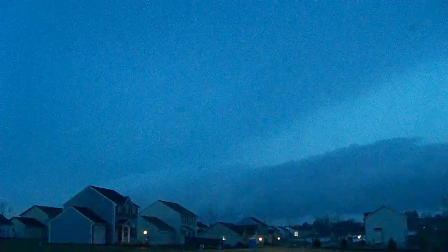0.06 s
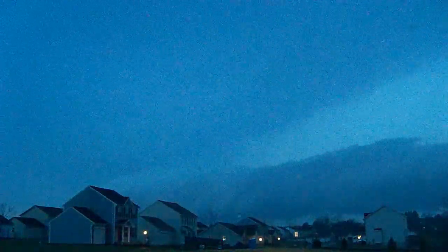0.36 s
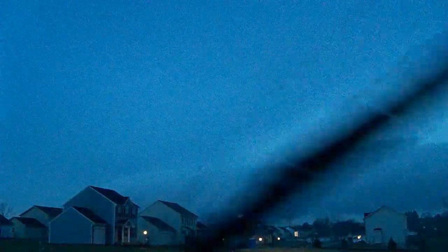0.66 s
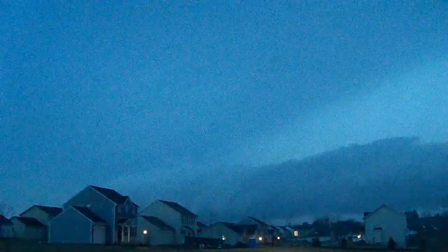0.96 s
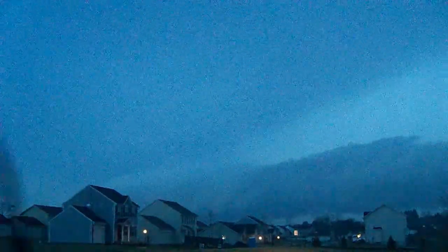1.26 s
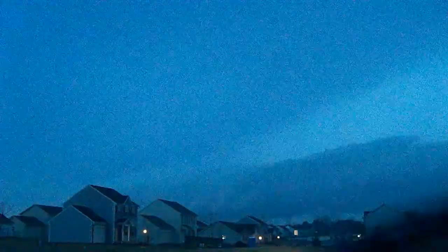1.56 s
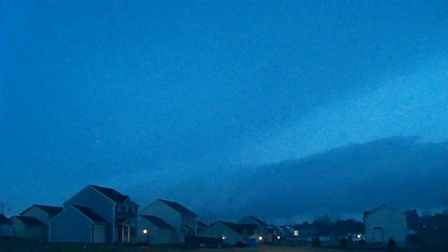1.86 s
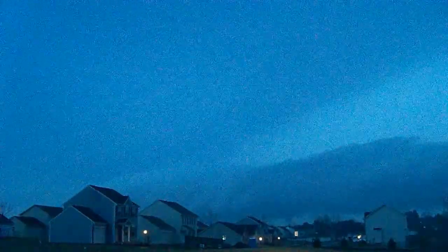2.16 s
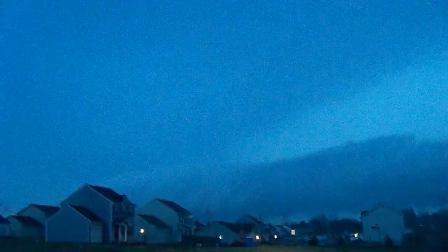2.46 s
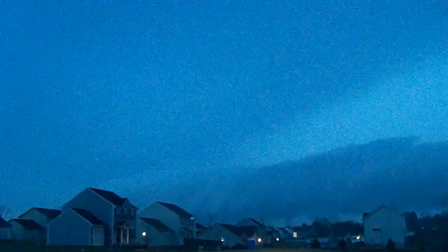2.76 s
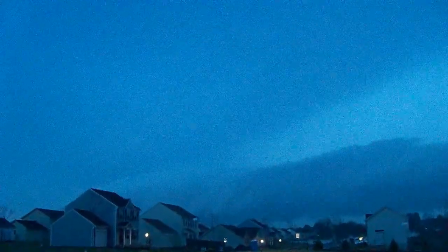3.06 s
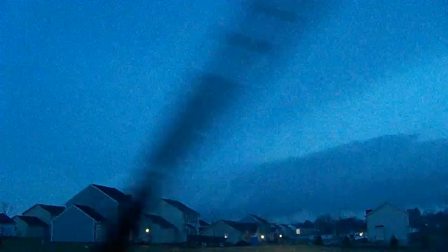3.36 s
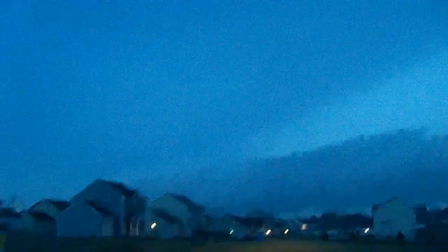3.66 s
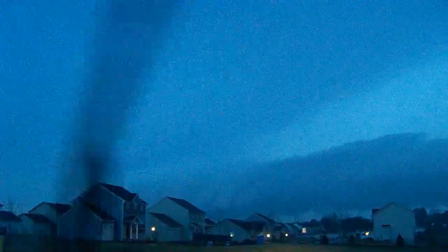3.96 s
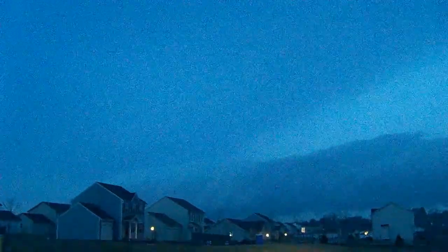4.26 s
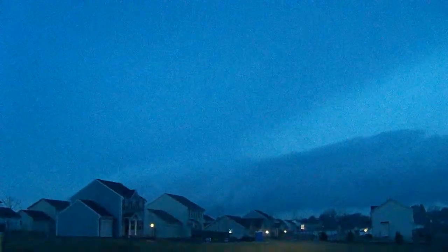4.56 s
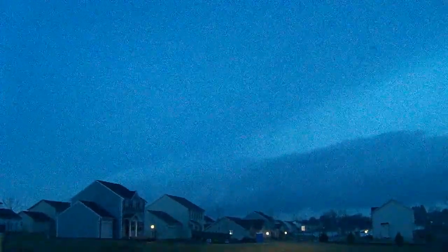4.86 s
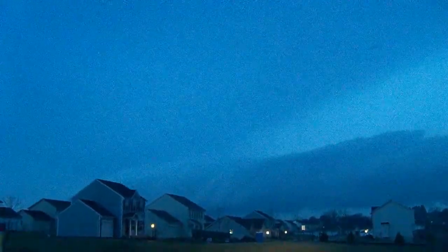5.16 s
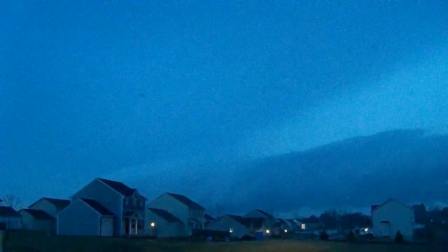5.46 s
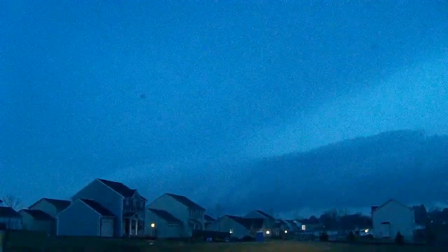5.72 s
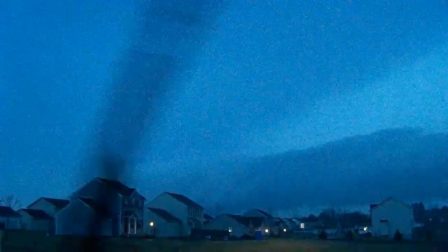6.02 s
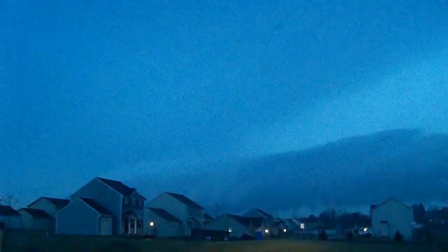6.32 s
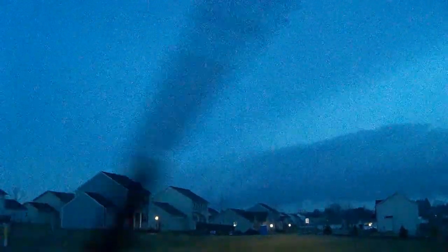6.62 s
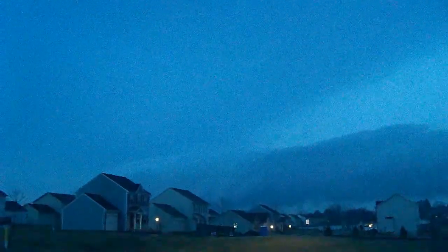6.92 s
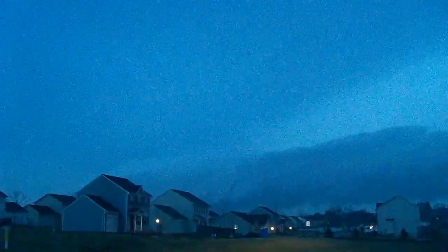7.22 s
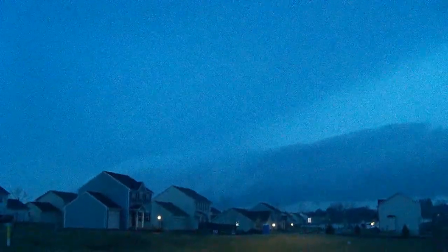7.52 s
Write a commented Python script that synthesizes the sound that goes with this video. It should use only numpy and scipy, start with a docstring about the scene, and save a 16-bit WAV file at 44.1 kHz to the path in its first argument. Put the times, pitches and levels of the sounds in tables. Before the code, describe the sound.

Inside a parked car, raindrops tick and wipers sweep while a low storm rumble swells and something clatters close by.

```python
"""Inside a parked car under a storm front. From the start raindrops strike glass and roof, and the wipers
begin the first of three sweeps: the motor whines, the linkage thumps, the rubber squeaks by stick-slip.
Halfway through, a low storm rumble swells and holds, exciting cabin resonances, and gusts bring washes
of rain. After five seconds something knocks about close by, ringing the trim; a short hiss follows,
and the last sweep runs under the rumble."""
import sys
import numpy as np
from scipy import signal
from scipy.fft import rfft, irfft
from scipy.io import wavfile
from scipy.ndimage import uniform_filter1d

SR = 44100
rng = np.random.default_rng(int(sys.argv[2]) if len(sys.argv) > 2 else 0)


def log_audio(samples):
    """Write samples as a 16-bit WAV file to the path given in sys.argv[1]."""
    # one column per channel
    frames = np.atleast_2d(samples).T
    # limit to full scale, then quantise
    limited = np.clip(frames, -1, 1)
    pcm = np.round(limited * 32767).astype(np.int16)
    wavfile.write(sys.argv[1], SR, pcm)


N = 338952
TIME = np.arange(N) / SR


# starts of the wiper sweeps, each out and back: t/s
SWEEP_STARTS = [.272, 2.890, 5.512]
def each_sweep(rows):
    """Periodic motion: the same events recur in every sweep."""
    return [(start + s, *rest) for start in SWEEP_STARTS for s, *rest in rows]


# shudders as the arms start, turn and park: t/s into the sweep, level/dB, rise/s, fall/s
SHUDDERS = [(.025, -32, .012, .03), (.165, -27, 0.05, 0.09), (.38, -30.5, 0.041, 0.055),
            (.855, -28, .015, .015), (.97, -26, 0.064, 0.035), (1.655, -23, 0.019, 0.042)]
# spectrum of the shaking: f/Hz, level/dB
SHAKE_SPECTRUM = [(30, -19.5), (70, -14), (105, 2), (150, 1.5), (200, -7.5), (300, -19.5), (420, -25.5),
                  (900, -45.5), (2000, -58.5)]
# the linkage taking up its play: t/s into the sweep, level/dB
THUMPS = [(.368, -30.5), (.843, -24.5), (.9, -29), (1.642, -23)]
# modes of cowl and cabin: f/Hz, level/dB, T60/s
COWL_MODES = [(45.4, -15.5, 0.4), (110.1, -5, 0.31), (120.66, -3, 0.48), (139.4, -5, 0.095),
              (161, -17, 0.057), (220, -17, 0.14), (311.2, -15.5, 0.19)]
def wiper_drive(run_s=1.68, shake_db=-4, thump_db=-1):
    """Forced vibration and backlash: the running linkage shakes the cowl and thumps at the turns."""
    running = [swell(s, run_s, db=-40.5, rise_s=.012, fall_s=.06) for s in SWEEP_STARTS]
    shudders = [swell(s, 0, db, rise_s, fall_s) for s, db, rise_s, fall_s in each_sweep(SHUDDERS)]
    out = undb(shake_db) * power_sum(running + shudders) * steady(noise(SHAKE_SPECTRUM), .05)
    for s, db in each_sweep(THUMPS):
        add(out, s, undb(db + thump_db) * ring(COWL_MODES, TIME[:SR // 2], push_s=.0042))
    return out


# bounces as the blades flip over: t/s, duration/s, gap between blows/s, level/dB
BOUNCES = [(.35, .09, .0257, -20.5), (1.216, .05, .032, -20), (2.97, .09, .0257, -20.5),
           (3.836, .05, .032, -23), (5.605, .09, .0257, -29), (6.456, .05, .032, -23)]
# modes of an arm on the glass: f/Hz, level/dB, T60/s
ARM_MODES = [(133, 0, .11), (195, -8.5, .07), (290, -16, .05)]
def wiper_bounces():
    """Repeated impact: evenly spaced soft blows on the glass excite the modes of the arms."""
    out = np.zeros(N)
    for s, length, gap_s, db in BOUNCES:
        blow = ring(ARM_MODES, TIME[:SR // 5], push_s=.003)
        for delay in np.arange(0, length, gap_s):
            add(out, s + delay, undb(db) * blow)
    return out


# rubber squeaks: t/s, duration/s, level/dB, first f/Hz, last f/Hz, roughness (0-1), relative octave/dB
SQUEAKS = [(.350, 0.015, -40.5, 1480, 1780, .5, -26), (0.364, 0.0087, -32.5, 1610, 1380, 0.53, -31),
           (0.37, 0.0095, -36.5, 1300, 1330, 0.76, -28), (0.381, 0.011, -36.5, 1395, 1290, 0.3, -28),
           (1.2417, .012, -33.5, 1830, 1716, 0.2, -13), (1.249, 0.01, -40, 1715, 1800, 0.45, -6),
           (1.253, .008, -41, 2330, 2450, .3, -25), (2.973, 0.013, -41.5, 1510, 1620, 0.47, -26),
           (2.985, .012, -34.5, 1436, 1815, .7, -26), (3.001, 0.015, -33.5, 1220, 1366, 0.42, -28),
           (3.846, 0.013, -44.5, 2100, 1880, 0.77, -13), (3.858, .015, -34.5, 1756, 1860, 0.3, -14),
           (5.6, 0.008, -37, 1672, 1670, .5, -18), (5.608, 0.0096, -32.5, 1410, 1630, 0.68, -24),
           (5.622, 0.011, -36.5, 1290, 1390, 0.35, -26)]
# resonances of blade and glass: f/Hz, level/dB
RASP_SPECTRUM = [(300, -22), (900, 0), (1300, -1), (1900, 0), (2400, 5), (2800, -17), (3200, -9),
                 (3550, -15), (4000, 0), (4500, -18.5), (5600, -15.5), (7000, -29)]
def wiper_squeaks(squeak_db=-.5, third_db=-14, rasp_db=-3.5):
    """Stick-slip oscillation: the rubber chirps as it flips; uneven slips excite blade and glass."""
    out = np.zeros(N)
    for s, length, db, first_hz, last_hz, rough, octave_db in SQUEAKS:
        n = int(length * SR)
        hz = np.linspace(first_hz, last_hz, n) * (1 + .12 * rough * walk(1100, n))
        grip = undb(5 * rough * walk(800, n))
        phase = 2 * np.pi * np.cumsum(hz) / SR
        slip = np.sin(phase) + undb(octave_db) * (np.sin(2 * phase) + undb(third_db) * np.sin(3 * phase))
        rasp = undb(rasp_db) * rough * unit(colour(rng.standard_normal(n), RASP_SPECTRUM))
        chirp = (unit(slip * grip) + rasp) * signal.windows.tukey(n, .5)
        add(out, s, undb(db + squeak_db) * unit(chirp))
    return cabin_echoes(out)


# rubber scraping wet glass: t/s into the sweep, duration/s, level/dB, cutoff f/Hz
SCRAPES = [(.058, .11, -45.5, 4400), (.72, 0.15, -52.5, 4000), (.875, .09, -49.5, 2000),
           (.925, .095, -51, 6000), (1.592, .065, -46, 3300), (1.645, .035, -53.5, 5000)]
def wiper_scrapes():
    """Sliding friction: the blades rub over the glass at the same points of each sweep."""
    return friction(each_sweep(SCRAPES))


# the two strokes, the whine rising along each: t/s into the sweep, duration/s, first f/Hz, last f/Hz
STROKES = [(.13, .84, 701, 826.5), (.97, .68, 721.4, 838.5)]
def wiper_motor(whine_db=-56.5, hum_db=-55, whine_at=.3, hum_at=.8, spread=.26):
    """Rotational tones: the motor whines early in a stroke and hums an octave lower as the load eases."""
    out = np.zeros(N)
    for s, length, first_hz, last_hz in each_sweep(STROKES):
        n = int(length * SR)
        along = np.linspace(0, 1, n)
        hz = np.linspace(first_hz, last_hz, n) * (1 + .024 * walk(110, n))  # the blades drag unevenly
        phase = 2 * np.pi * np.cumsum(hz) / SR
        whine = undb(whine_db + 2 * walk(27, n)) * np.exp(-((along - whine_at) / spread) ** 2)
        hum = undb(hum_db + 2 * walk(25, n)) * np.exp(-((along - hum_at) / spread) ** 2)
        add(out, s, (whine * np.sin(phase) + hum * np.sin(phase / 2)) * signal.windows.tukey(n, .1))
    return out


# the biggest drops on the glass, and one high tick with the knock at 2.36 s: t/s, level/dB, ring f/Hz
DROPS = [(0.0645, -43, 2070), (.077, -41, 2300), (.1072, -44, 3300), (0.161, -46, 2260),
         (0.1934, -37.5, 2500), (.2094, -44, 1210), (0.2213, -42, 1800), (.245, -44, 3600),
         (.4409, -43, 1210), (0.539, -41, 1990), (0.7604, -43, 2410), (0.7993, -41.5, 1590),
         (0.8589, -44.5, 2430), (1.147, -43, 1850), (1.4022, -50, 1790), (1.6448, -45.5, 2020),
         (1.6898, -43, 1550), (1.761, -33, 2500), (1.8204, -41.5, 2790), (1.835, -42, 2400),
         (1.933, -39, 1900), (1.962, -43.5, 1860), (2.015, -41.5, 1910), (2.0215, -43, 2400),
         (2.0464, -51, 2630), (2.1357, -39, 1500), (2.2394, -45.5, 1360), (2.348, -41, 3900),
         (2.3585, -44, 5600), (2.4433, -49, 2540), (2.46, -44.5, 2600), (2.4834, -41, 2260),
         (2.5415, -43.5, 1640), (2.6236, -41, 1770), (2.743, -40.5, 2350), (2.8825, -40.5, 2540),
         (3.5455, -43, 1400), (3.5567, -40, 2900), (3.6575, -41, 3200), (3.6763, -37.5, 2170),
         (3.71, -42, 2200), (4.4922, -41, 4200), (4.554, -40, 3050), (4.6872, -40.5, 2600),
         (5.0621, -38, 1825), (5.7646, -37, 2400), (5.7745, -36, 2000), (5.789, -39, 3600),
         (5.9264, -37, 2430), (6.1321, -39, 1540), (7.0227, -39.5, 2270)]
# spectrum of a drop's impact: f/Hz, level/dB
DROP_SPECTRUM = [(30, -40.5), (150, 0), (400, 0), (680, 8), (1000, 4), (1700, 1), (2400, 3.5), (3500, -4.5),
                 (5200, -10), (7000, -21), (9000, -46.5)]
def raindrops(drop_db=1.2, ring_db=-9, ring_t60=.024, spot_db=3):
    """Impact excitation: each big drop cracks on the glass, and the struck spot rings at its own pitch."""
    out, t = np.zeros(N), TIME[:SR // 8]
    for s, db, hz in DROPS:
        spot = [(f, level + spot_db * np.exp(-(2 * np.log2(f / hz)) ** 2)) for f, level in DROP_SPECTRUM]
        contact = impact(t, hit_t60=.022, tail_t60=.09, tail_db=-7) * (1 - np.exp(-t / .0005))
        crack = peak(colour(contact, spot))
        tone = undb(ring_db) * fade(t, ring_t60) * np.sin(2 * np.pi * hz * t)
        add(out, s, undb(db + drop_db) * (crack + tone))
    return out


# rolls swelling out of the storm: t/s, rumble level/dB, roar level/dB, rise/s, fall/s
ROLLS = [(3.6, -30.5, -38.5, 0.034, 0.35), (3.8, -32.5, -40.5, 0.062, 0.16),
         (3.989, -19.5, -34.5, 0.046, 0.2), (4.15, -23, -36.5, 0.085, .1),
         (4.55, -26.5, -37.5, 0.035, 0.046), (4.69, -28, -49, .012, 0.021), (4.805, -27, -51, 0.017, 0.02),
         (5.0, -30.5, -43, .04, 0.047), (5.75, -35, -39, 0.32, 0.3), (6.49, -33.5, -38, 0.084, .16),
         (7.22, -34, -43.5, 0.022, .03), (7.48, -38, -47, 0.035, 0.033)]
# spectra of the low rumble and the roar above it: f/Hz, level/dB
RUMBLE_SPECTRUM = [(20, -42.5), (48, -10), (72, -18), (100, -5.5), (145, 3.5), (185, -3), (225, -6),
                   (270, -12), (330, -22.5), (600, -65)]
ROAR_SPECTRUM = [(130, -24), (260, -3), (360, 6.5), (440, -0.5), (540, -6), (700, -7), (900, -12),
                 (1300, -17), (1900, -35.5), (3500, -51.5), (6500, -43), (8000, -62.5)]
def storm(storm_db=-1, grain_db=1.67, cabin_hz=530, cabin_q=30, drone_db=-20):
    """Broadband excitation: a rolling rumble and a grainy roar, which drives a narrow cabin resonance."""
    bed = swell(3.585, hold_s=3.16, db=0, rise_s=.028, fall_s=1.7)
    rolls = [(swell(s, 0, 0, rise, fall), low_db, high_db) for s, low_db, high_db, rise, fall in ROLLS]
    low_gain = power_sum([undb(-35.5) * bed] + [undb(db) * roll for roll, db, _ in rolls])
    high_gain = power_sum([undb(-41.5) * bed] + [undb(db) * roll for roll, _, db in rolls])
    rumble = low_gain * steady(noise(RUMBLE_SPECTRUM), .065)
    grains = rng.standard_normal(N) * undb(grain_db * walk(90))
    roar = high_gain * steady(unit(colour(grains, ROAR_SPECTRUM)), .22)
    resonance = signal.lfilter(*signal.iirpeak(cabin_hz, cabin_q, fs=SR), grains)
    drone = low_gain * steady(unit(resonance), .22)
    return undb(storm_db) * (rumble + roar) + undb(drone_db) * drone


# cabin resonances stirred by the storm's rolls: t/s, duration/s, level/dB, f/Hz
DRONES = [(3.72, 0.15, -41.5, 380), (3.95, 0.33, -42, 528), (4.53, .1, -40, 365.5),
          (6.94, .13, -42.5, 362.7), (6.99, .11, -37, 165.4), (7.41, .15, -36.5, 175.2)]
def cabin_drones(waver_db=2):
    """Cavity resonance: single modes of the cabin hum briefly, wavering in pitch and level."""
    out = np.zeros(N)
    for s, length, db, hz in DRONES:
        n = int(length * SR)
        phase = 2 * np.pi * np.cumsum(hz * (1 + .015 * walk(40, n))) / SR
        envelope = undb(waver_db * walk(45, n)) * signal.windows.tukey(n, .7)
        add(out, s, undb(db) * unit(np.sin(phase) * envelope))
    return out


# knocks on the trim, among them the wiper motor starting and parking each sweep: t/s, level/dB, relative
# clack/dB, cutoff f/Hz
KNOCKS = [(0.275, -32.5, -27, 6000), (1.174, -29, -16, 2000), (1.893, -33, 1.5, 2400),
          (2.357, -39, 3, 6500), (2.3845, -35, -3, 2400), (2.898, -28, -29, 6000), (2.914, -31, -12, 2500),
          (3.66, -29, -5, 1100), (4.511, -25, 2, 1800), (5.1445, -17, -13, 6500), (5.154, -23.5, 3.5, 6500),
          (5.1571, -15, -9, 6000), (5.171, -23.5, -4, 5000), (5.1847, -14, -19, 2500),
          (5.2104, -19, -15, 2200), (5.237, -24, -8, 3000), (5.243, -23.5, -8, 4000),
          (5.251, -24, -8, 3000), (5.264, -27, -12, 2500), (6.484, -35, 9, 1400), (6.5, -26.5, -2, 1300),
          (7.133, -41, -1, 6000)]
# modes of the trim: f/Hz, level/dB, T60/s
TRIM_MODES = [(205, -6.5, 0.056), (262.7, -1.5, 0.18), (320, 4, 0.066), (710, -6, 0.012)]
# spectrum of contact noise: f/Hz, level/dB
CLACK_SPECTRUM = [(250, 1), (700, 6), (1000, 0), (1400, 1), (2300, -5.5), (4000, -10), (7000, -19),
                  (9000, -60.5)]
def knocks(thud_db=-11):
    """Free vibration: struck plastic trim rings hollow, with a dry clack and a thud through the cabin."""
    out, t = np.zeros(N), TIME[:SR // 5]
    for s, db, clack_db, cutoff_hz in KNOCKS:
        contact = lowpass(impact(t, hit_t60=.016, tail_t60=.096, tail_db=-5), cutoff_hz)
        clack = peak(colour(contact, CLACK_SPECTRUM))
        thud = peak(colour(rng.standard_normal(len(t)) * fade(t, .16), ROAR_SPECTRUM))
        body = ring(TRIM_MODES, t, push_s=.00033)
        add(out, s, undb(db) * (body + undb(clack_db) * clack + undb(thud_db) * thud))
    return out


# dull bumps on the dashboard: t/s, level/dB
BUMPS = [(3.57, -25), (4.425, -26), (5.275, -17), (5.728, -22), (6.595, -25), (7.21, -28)]
def bumps():
    """Heavy damping: blows on the dashboard excite the cowl modes, which die quickly."""
    out, t = np.zeros(N), TIME[:SR // 5]
    for s, db in BUMPS:
        add(out, s, undb(db) * peak(ring(COWL_MODES, t, push_s=.0017) * fade(t, .11)))
    return out


# hard taps and rattles close by, and at 6.48 s a blade snapping over at the top of the last sweep: t/s,
# level/dB, f/Hz, T60/s, relative low modes/dB
TICKS = [(1.7612, -33, 2400, .03, 2), (2.3575, -28, 1250, .022, 4), (2.3875, -37, 1600, .014, 0),
         (5.1358, -41, 4000, .03, -15), (5.1545, -25, 1900, .014, -3), (5.1665, -30, 1890, .012, -4),
         (5.173, -30, 2100, 0.01, -2), (5.1901, -32, 2200, .016, 2), (5.2085, -34, 2300, .02, -2),
         (5.222, -35, 2200, .02, -2), (5.2365, -27.5, 1690, 0.014, 5), (5.2435, -30, 1820, .012, 1),
         (5.257, -33, 1700, .012, 0), (5.2634, -28, 2350, 0.0095, -2), (5.2962, -24.5, 2140, 0.016, -13),
         (5.2965, -23.5, 2940, 0.025, -10), (5.2982, -31.5, 3600, 0.051, -10),
         (5.304, -32.5, 2300, 0.02, -4), (6.4835, -13.5, 2650, .008, 6), (6.485, -17, 2570, .014, -1)]
# modes of a tap: frequency ratio, level/dB, T60 ratio
TICK_MODES = [(.33, -8, 1), (.5, -2.5, 0.45), (.64, -1, 0.79), (1, 2.5, 0.97), (1.12, 6.5, 0.26),
              (1.65, -5.5, .45), (1.95, -7.5, 0.42), (2.25, -4.5, 0.28)]
def ticks(scatter_db=-11):
    """Modal superposition: a hard tap sounds several short-lived modes and a little scattered noise."""
    out, t = np.zeros(N), TIME[:SR // 10]
    for s, db, hz, t60, hollow_db in TICKS:
        modes = np.zeros(len(t))
        for k, (ratio, mode_db, share) in enumerate(TICK_MODES):
            gain = (-1) ** k * undb(mode_db + hollow_db * (ratio < 1))
            modes += gain * fade(t, t60 * share) * np.sin(2 * np.pi * hz * ratio * t)
        body = peak(modes * (1 - np.exp(-t / .00037)))
        scatter = peak(colour(impact(t, hit_t60=.014, tail_t60=.08, tail_db=-7), DROP_SPECTRUM))
        add(out, s, undb(db) * (body + undb(scatter_db) * scatter))
    return out


# rustles close by: t/s, duration/s, level/dB, cutoff f/Hz
RUSTLES = [(3.641, 0.047, -41, 1300), (4.497, 0.032, -46, 1800), (5.135, 0.056, -43.5, 6500),
           (5.15, .04, -40, 4500), (5.18, .115, -44.5, 3500), (5.739, 0.071, -43.5, 4000),
           (6.227, .17, -51, 4000)]
def rustles():
    """Sliding friction: brief rubs close to the listener."""
    return friction(RUSTLES)


# gusts sweeping rain over the body: t/s, level/dB, rise/s, fall/s
GUSTS = [(4.12, -54, .2, .15), (5.75, -50, .3, .3), (6.5, -49, .25, .3)]
# spectrum of the wash: f/Hz, level/dB
WASH_SPECTRUM = [(350, -30), (640, 0), (850, 0), (1250, -4), (1700, -14), (3000, -30), (8000, -55)]
def gusts():
    """Amplitude-modulated noise: wind-blown rain swells as a dull, grainy wash."""
    gain = power_sum([swell(s, 0, db, rise_s, fall_s) for s, db, rise_s, fall_s in GUSTS])
    return gain * undb(1.5 * walk(60)) * noise(WASH_SPECTRUM)


# spectrum of the hiss: f/Hz, level/dB
HISS_SPECTRUM = [(600, -2), (1000, -1.5), (2000, 3), (2600, -6), (3900, 1.5), (5200, -12), (6500, -15.5),
                 (8000, -45)]
def hiss():
    """Gated noise: a short soft hiss follows the knocking."""
    return swell(5.26, hold_s=.53, db=-52, rise_s=.027, fall_s=.015) * noise(HISS_SPECTRUM)


# resonance of a singing blade: f/Hz, level/dB
SING_SPECTRUM = [(1800, -60), (2340, -16), (2470, 0), (2600, -16), (3300, -60)]
def blade_song():
    """Narrow-band resonance: a blade sings faintly on the glass in the last sweep."""
    gain = swell(6.26, hold_s=.29, db=-64, rise_s=.025, fall_s=.025)
    flutter = undb(4 * walk(35))
    return gain * flutter * steady(noise(SING_SPECTRUM), .02)


# mean spectrum of small drops on roof and glass: f/Hz, level/dB
PATTER_SPECTRUM = [(30, -40), (150, -13.5), (400, -8), (700, 0.5), (1100, -2), (1700, -2), (2400, -0.5),
                   (3400, -6.5), (5200, -14.5), (7000, -25.5), (9000, -38.5)]
def patter(patter_db=-61.8, patches=12, drops_per_s=300, size_db=2.2, patch_db=2.5):
    """Shot noise: small drops of uneven size fall at random on patches, each with its own spectrum."""
    out, t = np.zeros(N), TIME[:SR // 8]
    for _ in range(patches):
        arrivals = rng.random(N) < drops_per_s / patches / SR
        sizes = undb(size_db * np.minimum(rng.exponential(size=N), 4))
        contact = impact(t, hit_t60=.008, tail_t60=.09, tail_db=-5)
        patch = [(hz, db + patch_db * rng.standard_normal()) for hz, db in PATTER_SPECTRUM]
        out += signal.fftconvolve(arrivals * sizes, unit(colour(contact, patch)))[:N]
    return undb(patter_db) * unit(out)


# spectrum of the weather as heard inside: f/Hz, level/dB
WEATHER_SPECTRUM = [(20, -12), (48, 9), (75, 7.5), (130, 11.5), (220, 5), (400, 0.5), (520, -3), (660, 0),
                    (1000, -5.5), (1600, -7), (2400, -20.5), (3500, -19.5), (5000, -30), (6200, -29),
                    (7600, -48.5)]
def far_weather(level_db=-53):
    """Transmission loss: far rain and wind come through the closed cabin as a low hush."""
    return undb(level_db + walk(13)) * noise(WEATHER_SPECTRUM)


def friction(rows):
    """Friction noise: short gritty rubs whose grip comes and goes."""
    out = np.zeros(N)
    for s, length, db, cutoff_hz in rows:
        n = int(length * SR)
        grip = undb(2.5 * walk(350, n))
        rub = lowpass(colour(rng.standard_normal(n) * grip, CLACK_SPECTRUM), cutoff_hz)
        add(out, s, undb(db) * unit(rub * np.hanning(n)))
    return out


def ring(modes, t, push_s):
    """Damped modes after a soft blow; each blow lands on another spot, varying level and pitch."""
    chance = rng.standard_normal((len(modes), 2))
    y = sum(undb(db + 2 * louder) * fade(t, t60) * np.sin(2 * np.pi * hz * (1 + .034 * sharper) * t)
            for (hz, db, t60), (louder, sharper) in zip(modes, chance))
    return peak(y * (1 - np.exp(-t / push_s)))


def impact(t, hit_t60, tail_t60, tail_db):
    """Double-slope decay: a hard contact and its scatter round the cabin."""
    return rng.standard_normal(len(t)) * (fade(t, hit_t60) + undb(tail_db) * fade(t, tail_t60))


def cabin_echoes(x, wet_db=-9, t60=.085):
    """Reverberation: quick reflections off glass and trim follow the direct sound."""
    t = TIME[:SR // 8]
    echoes = rng.standard_normal(len(t)) * fade(t, t60) * (t > .003)
    return x + undb(wet_db) * signal.fftconvolve(x, echoes / np.linalg.norm(echoes))[:len(x)]


def colour(x, points, size=4096):
    """Minimum-phase filter with a given spectrum, made by folding the cepstrum."""
    hz, db = np.transpose(points)
    bins = np.maximum(np.arange(size // 2 + 1) * SR / size, 1)
    gain = undb(np.interp(np.log(bins), np.log(hz), db))
    cepstrum = irfft(np.log(gain))
    cepstrum[1:size // 2] *= 2
    cepstrum[size // 2 + 1:] = 0
    return signal.fftconvolve(x, irfft(np.exp(rfft(cepstrum))))[:len(x)]


def lowpass(x, hz):
    """Second-order low-pass filter."""
    return signal.lfilter(*signal.butter(2, hz, fs=SR), x)


def noise(points):
    """Coloured noise of rms 1."""
    return unit(colour(rng.standard_normal(N), points))


def walk(rate_hz, size=N):
    """Smooth random fluctuation with a spread near 1."""
    k = max(int(SR / rate_hz), 1)
    held = np.repeat(rng.standard_normal(size // k + 2), k)
    return unit(uniform_filter1d(uniform_filter1d(held, k), k))[:size]


def steady(x, span_s):
    """Division by the running rms: evens out a noise, keeping its faster flutter."""
    return x / np.sqrt(uniform_filter1d(x ** 2, int(span_s * SR)) + 1e-9)


def swell(s, hold_s, db, rise_s, fall_s):
    """Envelope: a bell-shaped rise up to time s, a hold and an exponential decay."""
    early, late = np.maximum(s - TIME, 0), np.maximum(TIME - s - hold_s, 0)
    return undb(db) * np.exp(-(early / rise_s) ** 2 - late / fall_s)


def power_sum(gains):
    """Incoherent addition: unrelated swells add in power."""
    return np.sqrt(sum(g ** 2 for g in gains))


def fade(t, t60):
    """Exponential decay, 60 dB in t60 seconds."""
    return np.exp(-np.log(1000) * t / t60)


def undb(db):
    """Decibels to gain."""
    return 10 ** (np.asarray(db) / 20)


def unit(x):
    """Scale to rms 1."""
    return x / np.sqrt(np.mean(x ** 2))


def peak(x):
    """Scale to peak 1."""
    return x / np.abs(x).max()


def add(out, s, x):
    """Mix a sound in at time s."""
    i = max(int(s * SR), 0)
    out[i:i + len(x)] += x[:max(N - i, 0)]


def scene():
    """Superposition: all sources as heard from the front seat."""
    wipers = wiper_motor() + wiper_drive() + wiper_bounces() + wiper_squeaks() + wiper_scrapes()
    rain = raindrops() + patter() + gusts()
    knocking = ticks() + knocks() + bumps() + rustles()
    rumble = storm() + cabin_drones()
    background = far_weather() + hiss() + blade_song()
    return (wipers + rain + knocking + rumble + background)[None]


def record(dry, notch_hz=484, notch_q=8, notch_depth=.87, top_hz=7300):
    """Frequency response of a small microphone: a narrow dip in the mids and a steep treble cut."""
    notched = signal.lfilter(*signal.iirnotch(notch_hz, notch_q, fs=SR), dry)
    dipped = dry + notch_depth * (notched - dry)
    return signal.sosfilt(signal.ellip(8, .2, 70, top_hz, fs=SR, output="sos"), dipped)


dry = scene()
out = record(dry)
log_audio(out)
```